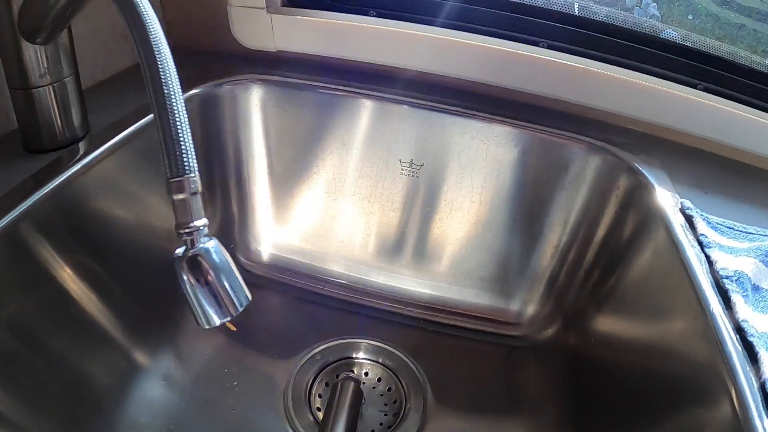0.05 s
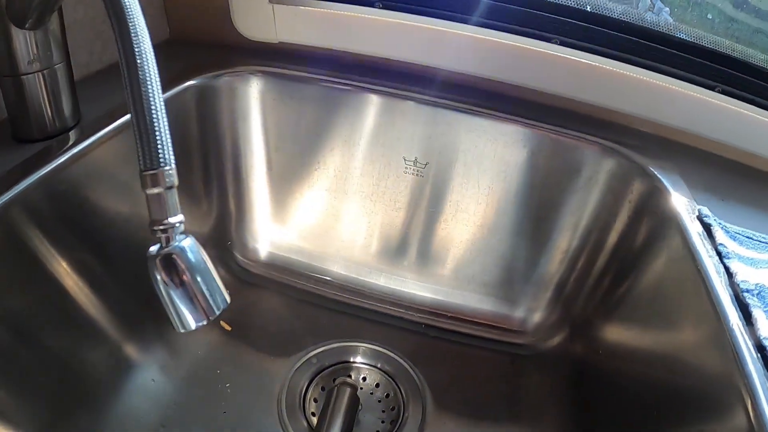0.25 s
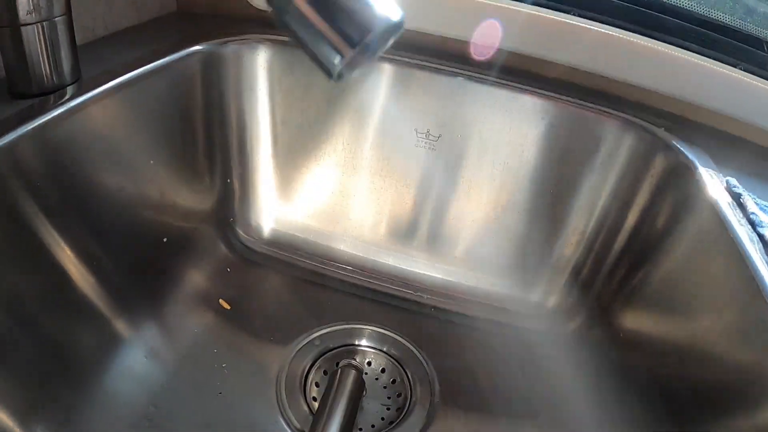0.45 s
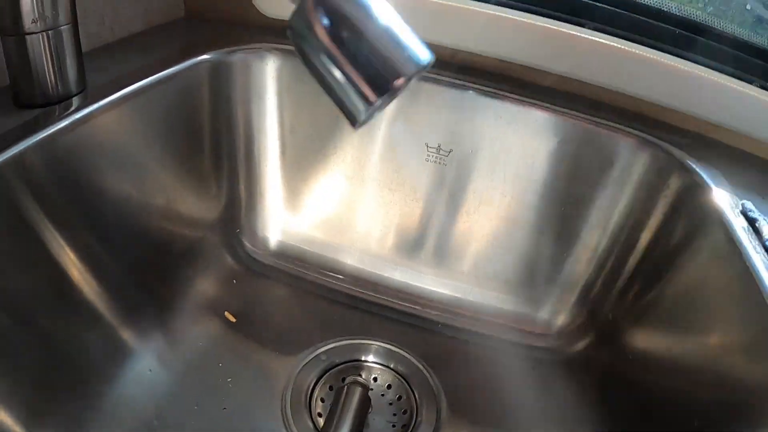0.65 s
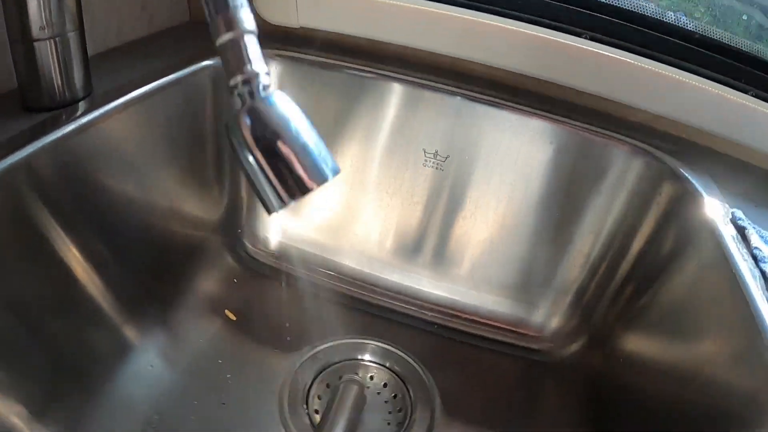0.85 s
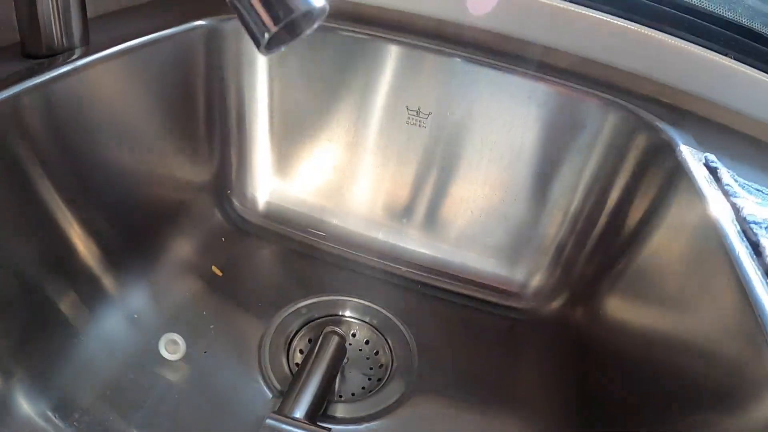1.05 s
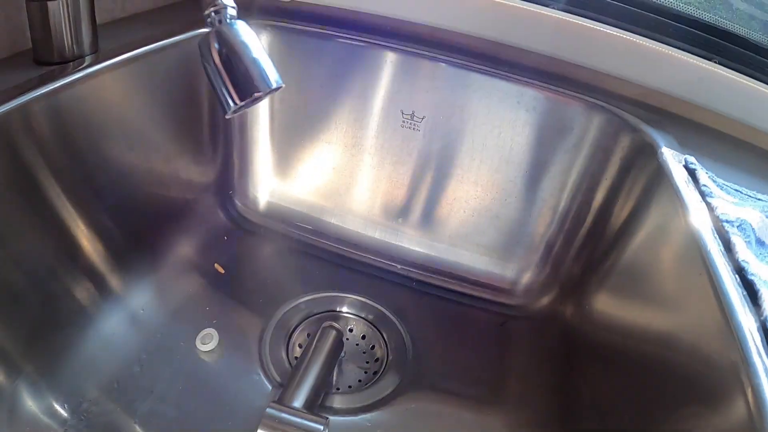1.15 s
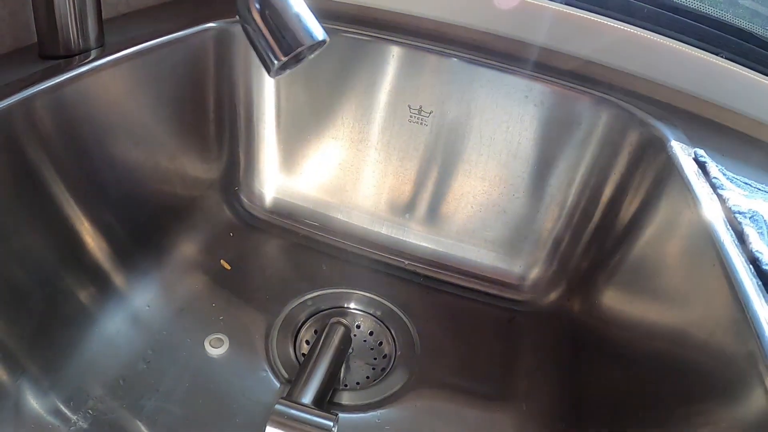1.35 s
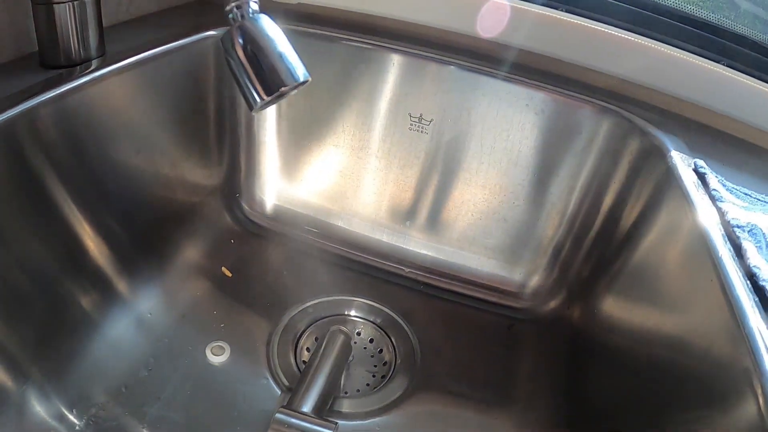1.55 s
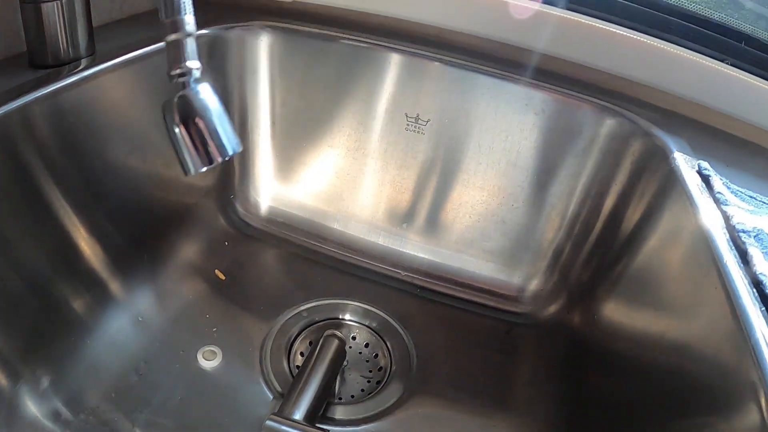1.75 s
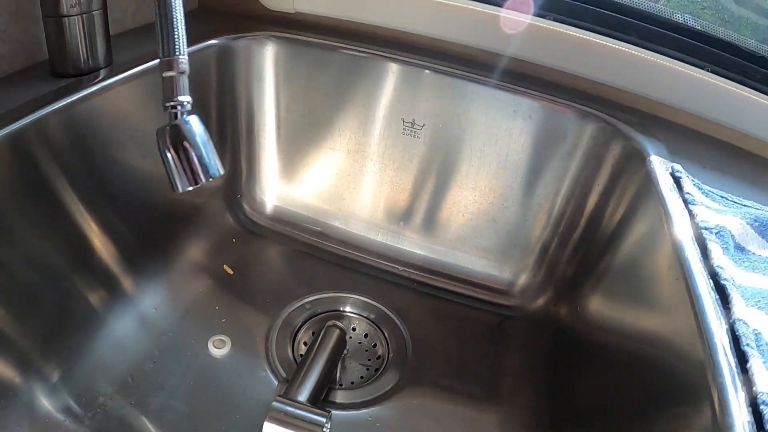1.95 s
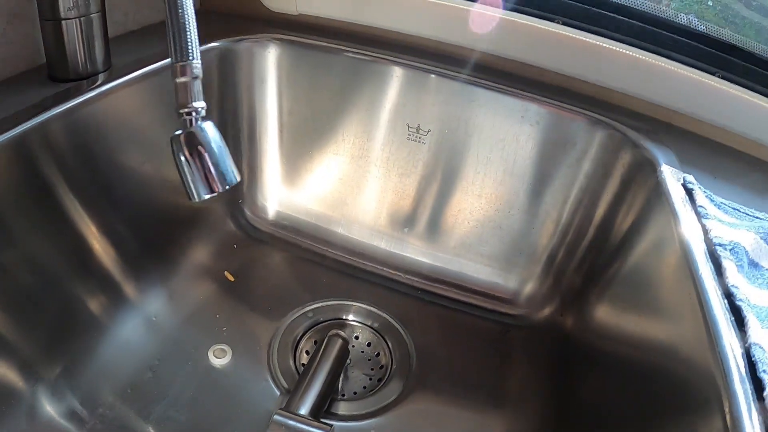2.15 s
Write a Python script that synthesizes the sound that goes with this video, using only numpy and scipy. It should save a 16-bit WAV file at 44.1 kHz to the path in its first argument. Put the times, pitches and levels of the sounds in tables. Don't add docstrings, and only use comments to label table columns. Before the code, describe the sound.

A fierce burst of pressurized air blasts a metal sink, rumbling the microphone, then shuts off

```python
import sys
import numpy as np
from scipy import signal
from scipy.io import wavfile
from scipy.ndimage import uniform_filter1d

SR = 44100
rng = np.random.default_rng(int(sys.argv[2]) if len(sys.argv) > 2 else 0)


def decibels_to_gain(level_db):
    exponent = np.asarray(level_db, float) / 20
    return 10 ** exponent


def unload_wav(signal):
    wavfile.write(
        sys.argv[1],
        SR,
        np.round(np.clip(np.atleast_2d(signal).T, -1, 1) * 32767).astype(np.int16),
    )


N = 97020
T = np.arange(N) / SR
OPEN_S = 0.3925
SINCE_OPEN = np.clip(T - OPEN_S, 0, None)
LEFT_RIGHT = np.array([[1], [-1]])


def rms_one(x):
    return x / np.sqrt(np.mean(x ** 2) + 1e-20)


def at_hz(points, hz):
    points_hz, values = np.array(points).T
    return np.interp(np.log(hz), np.log(points_hz), values)


def drift(rate_hz):
    r = np.exp(-2 * np.pi * rate_hz * 40 / SR)
    slow = signal.lfilter([1], [1, -2 * r, r * r], rng.standard_normal(N // 40 + 2002))[2000:]
    return np.interp(np.arange(N) / 40, np.arange(len(slow)), rms_one(slow - slow.mean()))


def resonance(x, hz, width_hz):
    r = np.exp(-np.pi * width_hz / SR)
    gain = (1 - r * r) / 2
    return signal.lfilter([gain, 0, -gain], [1, -2 * r * np.cos(2 * np.pi * hz / SR), r * r], x)


def bands(low_hz, count):
    edges = low_hz * 2 ** (np.arange(count + 1) / 3)
    white = rng.standard_normal((2, 2, N + 8000))
    for k in range(count):
        sos = signal.butter(2, edges[k:k + 2], "band", fs=SR, output="sos")
        yield np.sqrt(edges[k] * edges[k + 1]), signal.sosfilt(sos, white[k % 2])[:, 8000:]


def spread(pair, alike):
    alike = np.clip(alike, 0, 1)
    return np.sqrt(1 + alike) * pair[0] + np.sqrt(1 - alike) * pair[1] * LEFT_RIGHT


def background():
    # f/Hz, level/dB [per Hz]
    cabin_colour = [(100, 0), (150, -3), (230, -25.5), (330, -28.5), (600, -30), (1200, -29), (1700, -36),
                    (2400, -48.5)]
    room = 0
    for hz, pair in bands(low_hz=89, count=16):
        room = room + decibels_to_gain(at_hz(cabin_colour, hz)) * spread(resonance(pair, hz, hz / 2), 1 - hz / 6000)
    room = decibels_to_gain(-42.5 - 4) * rms_one(room)

    rumble_hz, rumble_width_hz = 69, 14
    rumble = resonance(rng.standard_normal(N + SR), rumble_hz, rumble_width_hz)
    rumble = rms_one(resonance(rumble, rumble_hz, rumble_width_hz)[SR:])
    rumble = decibels_to_gain(-41) * (rumble + 1.4 * np.sin(2 * np.pi * rumble_hz * T))

    hum_hz, hum_off_s = 457.6, 0.6
    hum = decibels_to_gain(-54.5 + 0.8 * drift(8)) * np.sqrt(2) * np.sin(2 * np.pi * hum_hz * T)
    hum = hum * np.clip((hum_off_s - T) * 20, 0, 1)

    grit = decibels_to_gain(-82 + 3.7 * drift(30)) * rms_one(resonance(rng.standard_normal((2, N)), 4500, 4000))
    settle = decibels_to_gain(-4.5 * np.clip(T - 0.4, 0, 1))
    return (room + rumble) * settle + hum + grit


def ticks():
    # t/s, level/dB
    rim_ticks = [
        (.02, -60),
        (.228, -58),
        (.262, -58),
    ]
    s, db = np.transpose(rim_ticks)
    clicks = np.full(N, 1e-18)
    clicks[(s * SR).astype(int)] = decibels_to_gain(db + 13)
    return resonance(clicks, 4200, 600) + resonance(clicks, 5900, 900) + resonance(clicks, 600, 320)


def thump():
    start_s, rise_s, t60_s = 0.2285, 0.009, 0.16
    u = np.clip(T - start_s, 0, None)
    shape = (1 - np.exp(-u / rise_s)) * decibels_to_gain(-14 - 60 * u / t60_s)
    return shape * (np.sin(2 * np.pi * 108 * u) + 0.42 * np.sin(2 * np.pi * 150 * u))


def spit():
    centre_s, half_length_s = 1.893, 0.011
    hiss = rms_one(resonance(resonance(rng.standard_normal(N), 7370, 3500), 6100, 4200))
    return decibels_to_gain(-64) * hiss * np.exp(-((T - centre_s) / half_length_s) ** 2)


def draught():
    # centre t/s, level/dB, half length/s, brightness/dB [per octave]
    gusts = [(0.435, -23.5, .025, -9), (0.481, -19, 0.019, -7.5), (0.592, -12, 0.025, -11),
             (0.547, -19, 0.039, -10.5), (0.675, -22.5, 0.095, -9), (0.785, -26.5, 0.057, -7),
             (.903, -10.5, 0.016, -10), (.87, -22, .03, -16.5), (.965, -19.5, 0.019, -9.5),
             (1.012, -9.5, 0.012, -9), (1.072, -26, 0.082, -9), (1.284, -15, 0.06, -10.5),
             (1.33, -14.5, 0.023, -8.5), (1.393, -4.5, 0.014, -8), (1.456, -8.5, 0.026, -9.5),
             (1.526, -18, 0.048, -14), (1.592, -9.5, 0.015, -10.5), (1.645, -8.5, 0.018, -8.5),
             (1.723, -11, 0.038, -10), (1.793, -12, 0.011, -12), (1.833, -20, .022, -14),
             (1.921, -22.5, 0.03, -24.5)]
    knee_hz, lump_db, wind_likeness = 117.2, 2, 0.3
    s, db, length, tilt = np.transpose(gusts)
    slow = T[::64]
    bells = np.exp(-((slow - s[:, None]) / length[:, None]) ** 2)
    out, lumps = 0, drift(20)
    for hz, pair in bands(low_hz=22, count=20):
        octaves = np.log2(hz / knee_hz)
        above = max(octaves, 0)
        colour = db + tilt * above + 0.14 * min(octaves, 0) - 2.0 * max(np.log2(32 / hz), 0)
        level = np.interp(T, slow, np.sqrt(decibels_to_gain(colour) ** 2 @ bells))
        lumpiness = decibels_to_gain(lump_db * (1 + 0.27 * above) * (0.5 * lumps + 0.93 * drift(30)))
        out = out + level * lumpiness * spread(pair, wind_likeness)
    return decibels_to_gain(17.5) * out


def spray():
    # f/Hz, level/dB [per Hz]
    colour = [(600, -28), (1300, -11.5), (1750, -15.5), (2100, -14), (4200, -0.5), (8000, -10),
              (12000, -18), (15500, -39)]
    # f/Hz, likeness [0-1]
    likeness = [(900, .95), (2200, .95), (3600, .58), (8000, .3), (13000, 0)]
    # f/Hz, left minus right/dB
    lean = [(900, 0), (5000, 0.5), (10000, -3), (15000, -10.5)]
    lag_s, sag_db, sag_s, pivot_hz = 0.014, 15, 0.9, 6000
    out, together = 0, drift(25)
    for hz, pair in bands(low_hz=600, count=14):
        above = max(np.log2(hz / pivot_hz), 0)
        off_centre = abs(np.log2(hz / 4200))
        rise_s = lag_s * min(off_centre, 1.5 if hz > 4200 else 0.6) + 1e-3
        late = np.clip(SINCE_OPEN / rise_s, 0.01, 1) ** 2
        late = late + (T < OPEN_S) * decibels_to_gain(-25 * off_centre)
        db = at_hz(colour, hz) - sag_db * above * (1 - np.exp(-SINCE_OPEN / sag_s))
        db = db + 0.5 * together + 1.0 * drift(7.4)
        balance = decibels_to_gain(at_hz(lean, hz) / 2 * LEFT_RIGHT)
        out = out + decibels_to_gain(db) * late * spread(pair, at_hz(likeness, hz)) * balance
    air_hz, fade_from_s, fade_db = 13800, 0.62, -17
    air = signal.sosfiltfilt(signal.butter(8, air_hz, "high", fs=SR, output="sos"), out)
    fade = np.clip((T - fade_from_s) * 10 + 0.2 * drift(3.5), 0, 1)
    return out - air * (1 - decibels_to_gain(fade_db * fade))


def sink(hiss):
    # f/Hz, width/Hz, level/dB
    modes = [(2180, 260, 3), (2900, 300, -1.5), (3270, 80, -22), (3653, 180, -2.5), (3854, 210, -5.5),
             (3955, 170, -11), (4185, 130, -1), (5285, 71, -2.5), (5690, 150, -2.5), (6606, 200, -0.5),
             (8530, 67, 5.5)]
    # f/Hz, width/Hz, level/dB
    whistles = [(730, 20, 0), (2233, 19, -1), (3293, 10, 6), (3530, 14.7, 9.5), (3990, 12.2, -7.5),
                (4605, 110, -8), (4940, 42, 1), (4790, 20, 2)]
    # t/s, f/Hz
    focus_path = [
        (.4, 4500),
        (.65, 4100),
        (.85, 5300),
        (1.05, 4300),
        (1.17, 4880),
        (1.4, 4640),
        (1.55, 4400),
        (1.77, 4570),
    ]
    # t/s, distance/m
    wall_path = [
        (.4, 0.69),
        (.7, 0.31),
        (1.0, 0.5),
        (1.3, 0.41),
        (1.55, .35),
        (1.8, 0.26),
    ]
    focus_db, focus_width_hz, wall_share = 8, 300, 0.16
    focus_hz = np.interp(T, *np.transpose(focus_path))
    ring = 0
    for hz, width_hz, db in [*modes, *whistles]:
        nearness = np.exp(-((hz - focus_hz) / focus_width_hz) ** 2)
        ring = ring + decibels_to_gain(db + focus_db * nearness + 2 * drift(3.1)) * resonance(hiss, hz, width_hz)
    out = hiss + ring
    lag = np.interp(T, *np.transpose(wall_path)) / 343 * SR
    reflection = np.array([np.interp(np.arange(N) - lag, np.arange(N), side) for side in out])
    return rms_one(out + wall_share * reflection)


def jet():
    # t/s, level/dB
    pressure = [
        (.3925, -12),
        (.399, -17),
        (.413, -15.5),
        (.5, -16.5),
        (.58, -17),
        (.63, -21),
        (.82, -17.5),
        (.9, -20),
        (1.3, -20.5),
        (1.768, -18.5),
    ]
    leak_s, shut_s = 0.371, 1.7565
    leak_db, leak_rise_db_per_s = -60, 903
    shut_t60_s, sink_t60_s, sink_tail_db = 0.075, 0.36, -24
    hiss = sink(spray())
    after = np.clip(T - shut_s, 0, None)
    flow = decibels_to_gain(np.interp(T, *np.transpose(pressure))) * np.clip(SINCE_OPEN / 0.0015, 0, 1)
    leak = decibels_to_gain(leak_db + leak_rise_db_per_s * (T - leak_s).clip(0, 0.03)) * (T > leak_s) * (T < OPEN_S)
    ringing = resonance(hiss, 4600, 3500) * decibels_to_gain(sink_tail_db - 60 * after / sink_t60_s)
    return (flow * decibels_to_gain(-60 * after / shut_t60_s) + leak) * hiss + flow * ringing


def scene():
    return background() + ticks() + thump() + spit() + draught() + jet()


def roll_off(x):
    return signal.sosfilt(signal.butter(12, 15690, fs=SR, output="sos"), x)


def record(dry):
    duck_db_per_db, duck_from_db, duck_s = 0.44, -15, 0.0213
    mono_db_per_s, mono_from_s = 16, 0.65
    power = uniform_filter1d(np.mean(dry ** 2, axis=0), int(duck_s * SR))
    excess_db = np.clip(10 * np.log10(power + 1e-12) - duck_from_db, 0, None)
    left, right = dry * decibels_to_gain(-duck_db_per_db * excess_db)
    mid = (left + right) / 2
    side = (left - right) / 2 * decibels_to_gain(-mono_db_per_s * np.clip(T - mono_from_s, 0, None))
    return roll_off(np.tanh(np.array([mid + side, mid - side])))


dry = scene()
out = record(dry)
unload_wav(out)
```